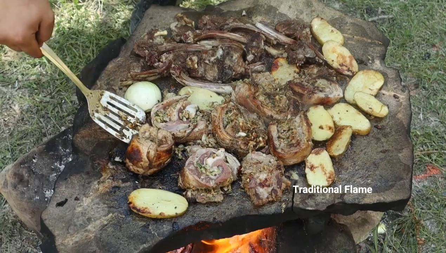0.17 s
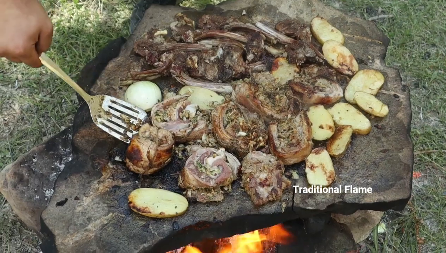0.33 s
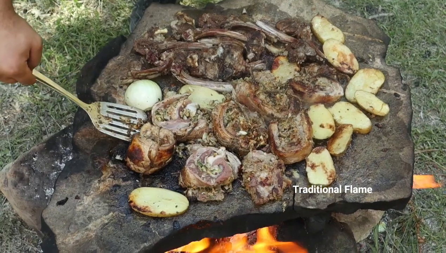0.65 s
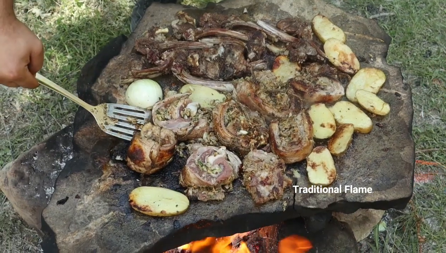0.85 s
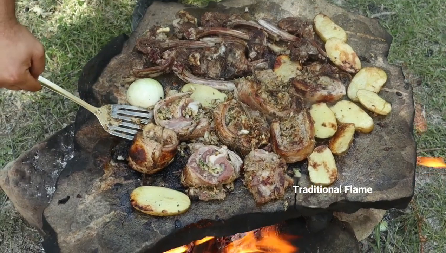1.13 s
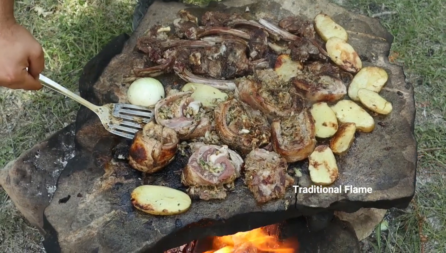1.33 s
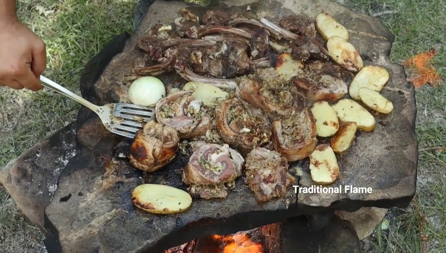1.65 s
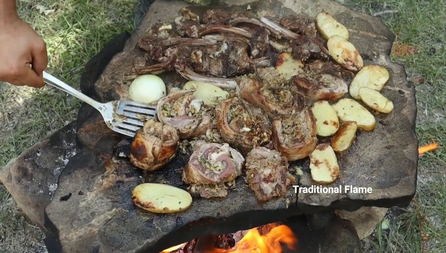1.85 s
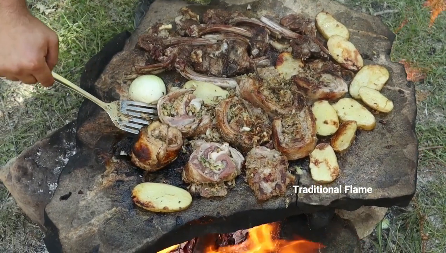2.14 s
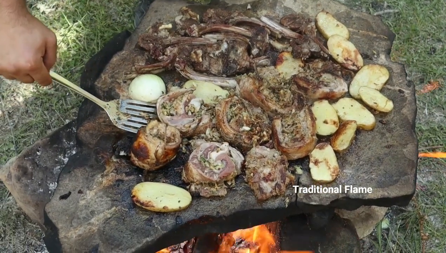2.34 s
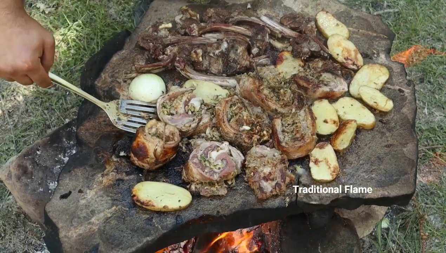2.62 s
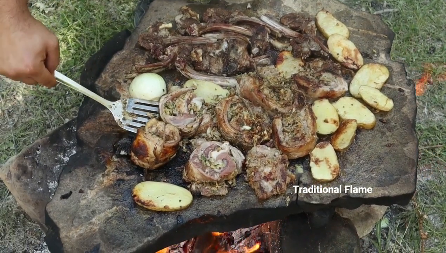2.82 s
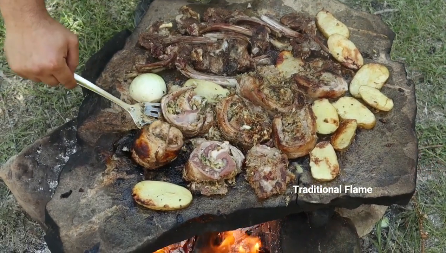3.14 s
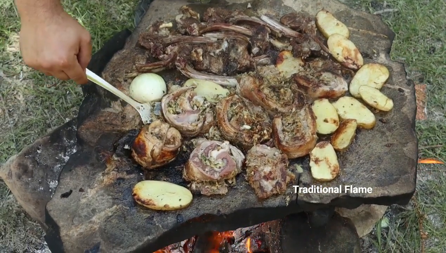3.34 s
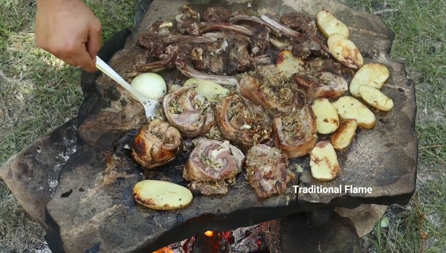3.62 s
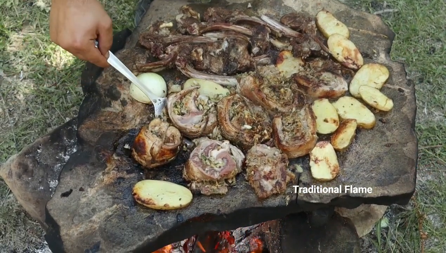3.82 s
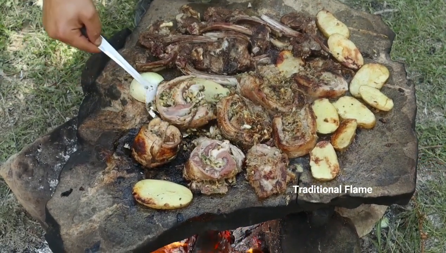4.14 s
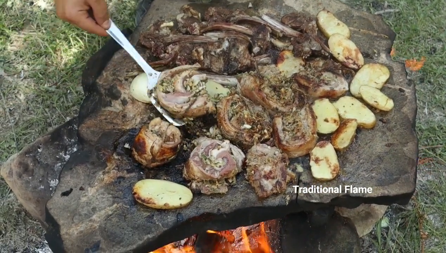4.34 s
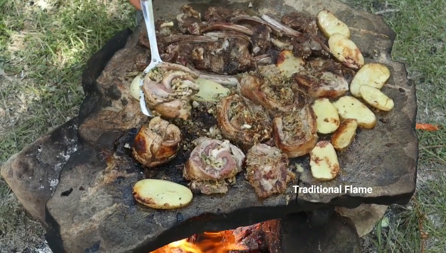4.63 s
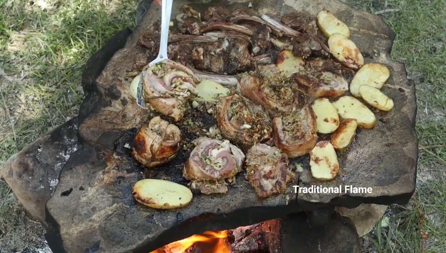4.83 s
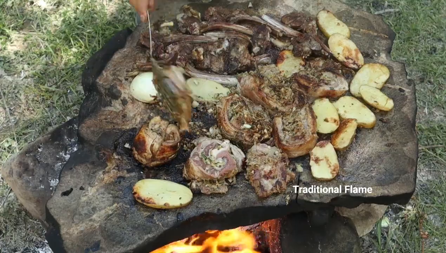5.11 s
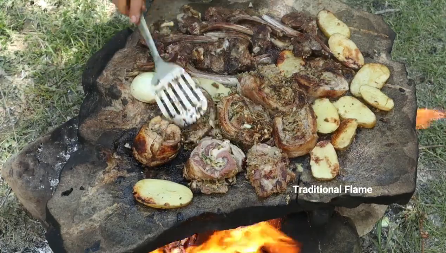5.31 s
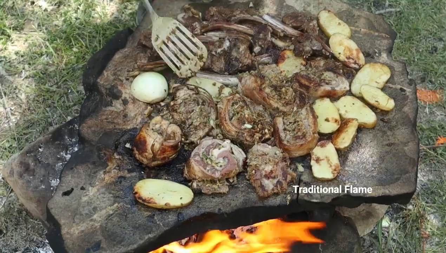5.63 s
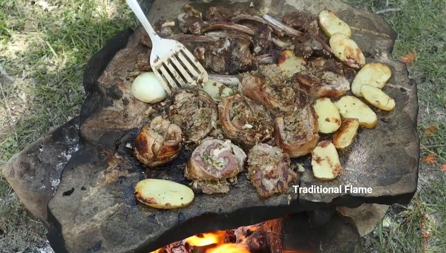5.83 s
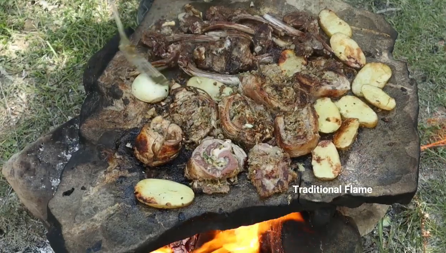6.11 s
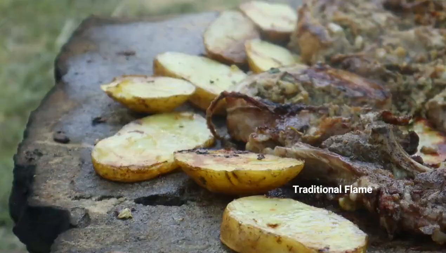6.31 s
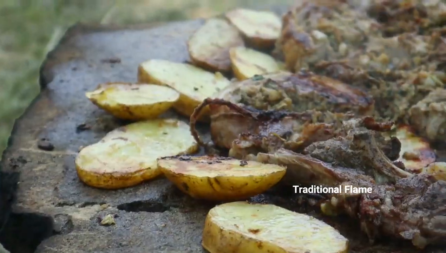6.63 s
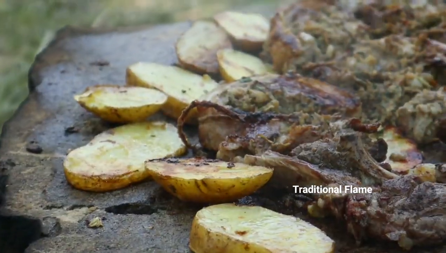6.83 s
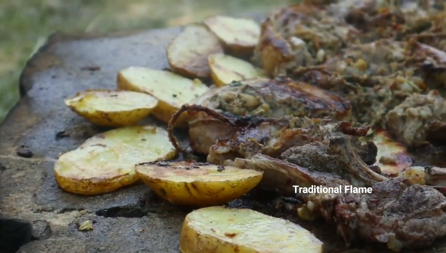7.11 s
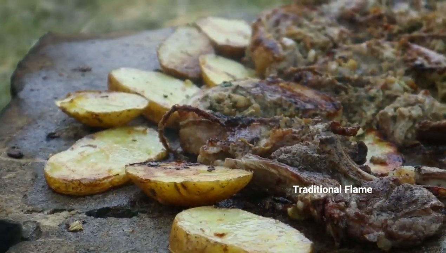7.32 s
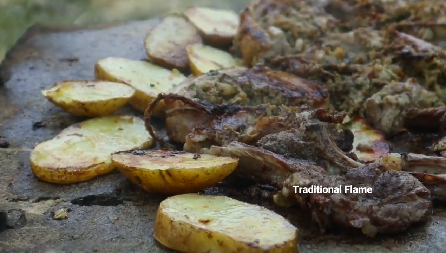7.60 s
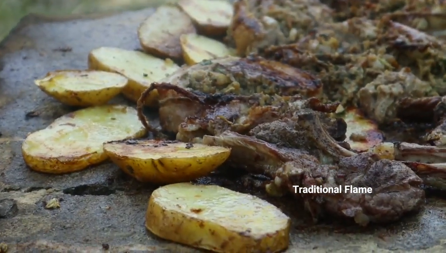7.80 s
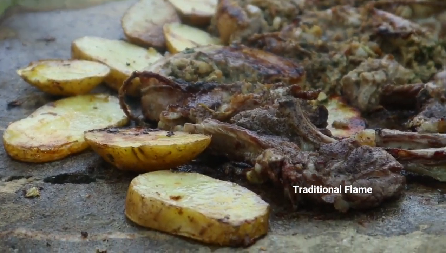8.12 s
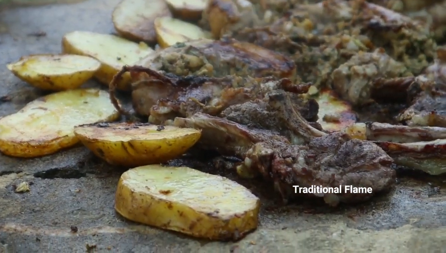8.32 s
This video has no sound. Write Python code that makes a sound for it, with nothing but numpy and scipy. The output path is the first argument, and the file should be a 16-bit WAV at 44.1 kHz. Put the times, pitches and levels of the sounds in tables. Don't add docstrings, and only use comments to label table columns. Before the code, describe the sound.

A close single microphone in open air catches fatty meat sizzling on hot stone: airy hiss, dense fizz, wet spits, woody-bright plops and dry snaps. Below, a wood fire flutters and rumbles faintly, flaring mid-way and at the end. Turning a piece makes the spitting busier; then comes a blink of silence and a gentler sizzle with sparse pops.

```python
import sys
import numpy as np
from scipy import signal
from scipy.fft import rfft, irfft, next_fast_len
from scipy.io import wavfile
from scipy.ndimage import uniform_filter1d, map_coordinates

SR = 44100
rng = np.random.default_rng(int(sys.argv[2]) if len(sys.argv) > 2 else 0)


def file_out(sig):
    cols = np.atleast_2d(sig).T
    lim = np.clip(cols, -1, 1)
    pcm = np.round(lim * 32767).astype(np.int16)
    wavfile.write(sys.argv[1], SR, pcm)


def voltage_ratio(decibels):
    exponent = np.asarray(decibels, float) / 20
    return 10 ** exponent


N = 373086
TIME = np.arange(N) / SR

# t/s, level/dB, fine bubbles over coarse/dB
FRYING = [(0, -51.5, 1), (.15, -49, -1.5), (.45, -48.5, -2), (.7, -45, 1.5), (1.2, -49, 2.5),
          (1.85, -46, 2), (2.5, -48, -0.5), (3.27, -48, 0.5), (3.5, -47.5, -0.5), (3.95, -49, 0),
          (4.8, -48, 0), (5.2, -49, -0.5), (5.45, -48, 0.5), (6.38, -47, 0.5), (6.43, -50, 1),
          (6.9, -51, 1), (7.9, -50.5, -0.5), (8.46, -51, 0)]
# t/s, peak level/dB, f/Hz, life/cycles
RESTING_PLOPS = [(0.0312, -22, 2600, 1.5), (1.0913, -22, 3370, 1), (0.1709, -23, 1390, 1.3),
                 (0.2295, -17, 2820, 0.52), (0.8917, -20, 2070, 0.92), (1.0713, -18.5, 2520, 0.35),
                 (1.1257, -22, 2380, 0.57), (1.4057, -18.5, 2540, 0.55), (1.471, -17, 2960, 0.44),
                 (1.526, -18, 2780, 1.6), (1.5515, -16.5, 3270, 1), (1.7297, -16.5, 2530, 0.47),
                 (1.7654, -16.5, 2390, 0.6), (1.88, -17.5, 2480, 1.12), (1.9982, -18, 4100, 1.2),
                 (2.167, -19.5, 2400, 1.3), (2.1991, -19, 2520, 0.73), (2.3472, -19, 2730, 2.1),
                 (2.4086, -17, 2400, 0.76), (2.6086, -19.5, 3560, 1.4), (2.6318, -16.5, 3020, 1.1),
                 (2.7745, -13, 4360, 0.36), (2.9028, -17.5, 2650, 0.99), (2.9228, -17, 2800, 0.87),
                 (3.2513, -18, 2250, 1.1), (3.4931, -19, 3040, 1), (3.9632, -21.5, 2760, 1.5),
                 (3.9782, -21.5, 2630, 1.6), (4.0067, -22.5, 2450, 2.3), (4.1755, -17, 2210, 1.7)]
# t/s, peak level/dB, f/Hz, life/cycles
TURNED_PLOPS = [(4.3649, -20.5, 2500, 4.5), (4.4818, -12.5, 3600, 0.66), (5.578, -23, 2260, 1.4),
                (4.6345, -16.5, 3440, 1.2), (4.647, -17, 2480, 1.1), (4.7642, -20.5, 3240, 1.4),
                (4.8383, -22, 2740, 1.05), (4.8829, -22, 3360, 2.5), (5.0286, -19.5, 2510, 0.96),
                (5.294, -14.5, 3850, 1.1), (5.3091, -15.5, 3530, 1.2), (5.5124, -21.5, 2080, 0.66),
                (5.4525, -17, 3000, 0.45), (5.782, -19, 3670, 2.4), (5.7897, -16.5, 2860, 0.64),
                (5.8456, -13.5, 3130, 0.49), (5.85, -15.5, 2040, 0.57), (5.889, -16, 2980, 0.84),
                (5.922, -16, 2920, 0.5), (5.9258, -16.5, 2030, 0.65), (6.3129, -12, 3770, 0.48),
                (6.324, -16.5, 2500, 0.61), (6.5096, -18, 3540, 1.4), (6.6637, -22, 2190, 0.98),
                (7.0248, -15, 3770, 1.4), (7.2578, -23, 2090, 1.2), (7.7533, -16, 3120, 0.58),
                (7.8607, -18.5, 2200, 0.27), (7.8853, -16, 4120, 0.47), (8.2649, -19.5, 4090, 1.5)]
# t/s, peak level/dB, f/Hz
RESTING_SNAPS = [(0.2242, -24, 4120), (0.6029, -23.5, 10470), (0.6735, -15.5, 7210), (0.7174, -14.5, 7000),
                 (0.735, -14, 7600), (1.2206, -17.5, 5520), (1.27, -18, 7250), (1.7423, -21, 7520),
                 (2.008, -22.9, 5560), (2.4391, -22, 5370), (2.4433, -16, 9100), (2.7695, -24, 7110),
                 (3.0518, -14.5, 7050), (3.268, -28, 8190), (3.446, -27, 5940), (3.695, -17.5, 6400),
                 (3.911, -23, 5750), (6.3684, -24, 4800), (4.0034, -20.5, 4580), (6.4423, -18.5, 4770),
                 (6.6173, -19, 6800), (6.7417, -16.5, 7850), (7.3054, -19.5, 7800), (7.4117, -22, 4550),
                 (7.4646, -21, 5200), (7.8574, -13, 8360), (8.0843, -19.5, 6500), (8.1206, -20.5, 10110),
                 (8.136, -21, 9300), (8.3813, -19, 4500)]
# t/s, peak level/dB, f/Hz
TURNING_SNAPS = [(4.1804, -18.5, 4560), (4.2088, -19, 7540), (4.422, -17, 7570), (4.506, -18, 6700),
                 (4.6867, -10.5, 8300), (4.7386, -19, 7030), (4.7491, -16, 6760), (4.7856, -10.5, 6000),
                 (4.7985, -17, 5950), (4.8077, -13, 7000), (4.819, -18.5, 5200), (4.647, -18, 6500),
                 (4.9289, -15.5, 6540), (4.962, -16, 7470), (5.0588, -20, 5450), (5.1548, -19.5, 5700),
                 (5.2638, -20, 4500), (5.3569, -13.5, 4700), (5.3893, -19, 5960), (5.409, -16.5, 5900),
                 (5.507, -17, 7450), (5.527, -18, 6760), (5.5386, -20.5, 4320), (5.753, -15, 4930),
                 (5.772, -16, 6600), (5.83, -20, 5560), (5.98, -18.5, 6220), (6.0942, -22, 6000),
                 (6.1248, -20, 6190), (6.1446, -13, 5400)]
# t/s, peak level/dB, f/Hz
MUFFLED_BURSTS = [(0.079, -26.5, 1170), (1.2666, -29.5, 1000), (1.2877, -37, 1100), (2.035, -25.5, 1200),
                  (2.051, -29, 930), (2.439, -29, 1290), (2.7746, -30, 1370), (4.06, -30, 960),
                  (5.47, -34, 1500), (5.844, -28, 1370), (7.6, -29, 1300)]
TURN = (4.2, 4.5, 6.3)
# from t/s, to t/s, level before/dB
WAKE = (.8, .9, -6)
# from t/s, to t/s
CUT = (6.3874, 6.4206)
# f/Hz, density level/dB
STEAM = [(240, -44), (400, -9), (707, 1.5), (1040, -0.5), (2240, 1), (6380, -1), (8280, -6), (10300, -2.5),
         (14200, -2.5), (15800, -4)]
# f/Hz, density level/dB
JET = [(5200, -30), (6600, -2), (7600, 3), (8800, 3.5), (9800, -7), (11500, -34)]
# t/s, level/dB
DRAUGHT_LEVEL = [(0, -74), (.5, -67.5), (.7, -63), (1, -69), (1.45, -68), (1.7, -79), (2.35, -67),
                 (2.7, -71.5), (3.3, -70), (3.7, -66.5), (4.3, -66.5), (4.7, -70.5), (5.9, -70.5),
                 (6.75, -61), (6.95, -71), (7.4, -71), (8.46, -67)]
# full at t/s, hold/s, level/dB
FLARES = [
    (1.45, .1, 2.5),
    (3.37, 0.78, 6),
    (8.304, .2, 5),
]
# f/Hz, density level/dB
FLAME = [(53, -30), (90, -10), (199, 1.5), (313, -4.5), (469, -11), (600, -13), (780, -33), (1320, -120)]
# f/Hz, density level/dB
DRAUGHT = [(12, -33), (20, -3), (102, -5), (150, -10.5), (200, -29), (330, -120)]
# f/Hz, level/dB
MICROPHONE = [(100, -5), (3000, -1.5), (6300, -1.5), (8300, 2), (9000, -0.5), (10300, -9.5), (12000, -3.5),
              (14200, -4.5), (15600, -9.5)]
# f/Hz, level/dB
SECOND_VIEW = [(4500, 2), (6300, -0.5), (8400, -0.5), (10500, -0.5), (13000, 0)]


def unit(x):
    return x / np.sqrt(np.mean(x ** 2) + 1e-20)


def along(points, hz):
    f, v = np.transpose(points)
    return np.interp(np.log(hz + 1), np.log(f + 1), v)


def curves(rows):
    s, *columns = np.transpose(rows)
    return [np.interp(TIME, s, column) for column in columns]


def wobble(rate):
    knots = rng.standard_normal(int(N * rate / SR) + 4)
    return map_coordinates(knots, [np.arange(N) * rate / SR])


def coloured(x, points, causal=False):
    m = 2 * next_fast_len(N // 2 + 4096)
    gain = voltage_ratio(along(points, np.fft.rfftfreq(m, 1 / SR)))
    if causal:
        cepstrum = irfft(np.log(gain + 1e-6), m)
        cepstrum[1:m // 2] *= 2
        cepstrum[m // 2 + 1:] = 0
        gain = np.exp(rfft(cepstrum))
    return irfft(rfft(x, m) * gain, m)[..., :N]


def turning():
    return np.interp(TIME, [TURN[0], TURN[1], TURN[2], CUT[0]], [0, 1, 1, 0])


def bursts(s, db, hz, life, onset, splash_db, size):
    splash_t60 = .006
    start = np.clip(s * SR, 0, N - 1)
    step = np.arange(size)
    t = np.maximum(step - start[:, None] % 1, 0) / SR
    cycle = t * hz[:, None]
    decay = np.exp(-np.maximum(cycle - .75, 0) / life[:, None])
    swell = (1 - np.exp(-(cycle / onset) ** 2)) * decay
    ring = -np.sin(2 * np.pi * cycle * (1 + 0.011 * cycle)) * swell
    ring -= 0.97 * swell * (ring.sum(1) / swell.sum(1))[:, None]
    spray = uniform_filter1d(rng.standard_normal(t.shape), size=7, axis=1) * np.sin(2 * np.pi * 1.9 * cycle)
    splash = voltage_ratio(splash_db - 60 * t / splash_t60) * (cycle > .3) * spray
    rows = voltage_ratio(db)[:, None] * (ring + splash)
    place = start.astype(int)[:, None] + step
    return np.bincount(place.ravel(), rows.ravel(), N + size)[:N]


def swarm(busy, count, mid_hz, octaves, spread_db, cap_db, life, onset, size):
    share = np.cumsum(busy)
    luck = rng.random((count, 2))
    draw = rng.standard_normal((count, 2))
    s = np.interp(luck[:, 0] * share[-1], share, TIME)
    cap = cap_db + 2 * draw[:, 1] - 1.2 * (s > CUT[1])
    db = np.minimum(-spread_db * np.log(1 - luck[:, 1]), cap)
    hz = np.clip(mid_hz * 2 ** (octaves * draw[:, 0]), 1400, 15500)
    lives = life * np.exp(0.21 * rng.standard_normal(count))
    return unit(bursts(s, db, hz, lives, onset, splash_db=-6, size=size))


def frying():
    vigour_db, fine_db = curves(FRYING)
    turn = turning()
    wake_db = np.interp(TIME, WAKE[:2], [WAKE[2], 0])
    crackle_db = vigour_db - 1.6 - 0.18 * fine_db - 1.5 * turn + wake_db + 0.93 * (TIME > CUT[1])
    spit_db = vigour_db - 0.53 - 0.98 * fine_db + 3.5 * turn + 1.7 * wobble(4)
    fizz_db = vigour_db - 0.6 + 1.0 * fine_db
    mist_db = 0.4 * fizz_db - 28.5
    busy = np.exp(.42 * wobble(60))
    crackle = swarm(busy, count=2200, mid_hz=2220, octaves=0.32, spread_db=8.5, cap_db=15.5,
                    life=0.79, onset=0.42, size=150)
    spit = swarm(busy, count=3200, mid_hz=3855, octaves=0.19, spread_db=5.0, cap_db=14.0,
                 life=0.62, onset=0.4, size=120)
    fizz = swarm(busy, count=5500, mid_hz=7800, octaves=0.287, spread_db=5.0, cap_db=14.5,
                 life=1.0, onset=0.22, size=80)
    mist = swarm(busy, count=4000, mid_hz=12070, octaves=0.264, spread_db=8.5, cap_db=21.0,
                 life=0.74, onset=0.58, size=60)
    return voltage_ratio(crackle_db) * crackle + voltage_ratio(spit_db) * spit + voltage_ratio(fizz_db - 1.0) * fizz + voltage_ratio(mist_db) * mist


def strays(busy, count, mid_db, mid_hz, octaves):
    draw = rng.standard_normal((count, 2))
    share = np.cumsum(busy)
    order = (np.arange(count) + 3 * rng.random(count)) / (count + 2)
    s = np.interp(order * share[-1], share, TIME)
    return np.array([s, mid_db + 0.73 * draw[:, 0], mid_hz * 2 ** (octaves * draw[:, 1])])


def large_bubbles():
    known = np.vstack([RESTING_PLOPS, TURNED_PLOPS]).T
    reach = .03 * 2 * SR
    near = np.bincount((known[0] * SR).astype(int), minlength=N)
    near = uniform_filter1d(near * reach, size=int(reach))
    busy = .4 * (TIME > WAKE[0]) + np.abs(near) + 2.5 * turning()
    some = strays(busy, count=60, mid_db=-23.5, mid_hz=3050, octaves=.2)
    return np.hstack([known, np.vstack([some, 0.77 + 0 * some[0]])])


def plops(large):
    s, db, hz, life = large
    ring = bursts(s - 0.81 / hz, db + 0.2, hz, .8 * life, onset=0.56, splash_db=-3.5, size=300)
    tick = bursts(s - .3 / hz, db - 21, 9000 + 0 * s, 0.59 + 0 * s, onset=0.13, splash_db=-9, size=300)
    return ring + tick


def thuds(large):
    s, db, hz, _ = large
    body_db = db - 15.5 - 13.5 * np.abs(np.log2(hz / 2300))
    s, db, hz = np.hstack([[s, body_db, 0.4 * hz], np.transpose(MUFFLED_BURSTS)])
    return bursts(s - 0.61 / hz, db, hz, 0.21 + 0 * s, onset=0.32, splash_db=-15, size=300)


def snaps():
    some = strays(1 + 7 * turning(), count=56, mid_db=-22, mid_hz=6330, octaves=.22)
    s, db, hz = np.hstack([np.vstack([RESTING_SNAPS, TURNING_SNAPS]).T, some])
    life = .5 * np.exp(.25 * rng.standard_normal(len(s)))
    ring_db = db - 0.5 * along(MICROPHONE, hz) - 0.9
    ring = bursts(s - .5 / hz, ring_db, hz, life, onset=.1, splash_db=-2.0, size=300)
    tick = bursts(s - .5 / hz, db - 16, 13000 + 0 * s, .5 + 0 * s, onset=.1, splash_db=-20, size=60)
    return ring + tick


def pops():
    large = large_bubbles()
    return plops(large) + thuds(large) + snaps()


def steam():
    vigour_db, fine_db = curves(FRYING)
    hiss = unit(coloured(rng.standard_normal(N), STEAM))
    jet = unit(voltage_ratio(1.5 * wobble(25)) * coloured(rng.standard_normal(N), JET))
    hiss_db = 0.84 * vigour_db - 3 - 1.1 * turning()
    jet_db = vigour_db - 7 + 2.4 * fine_db
    return voltage_ratio(hiss_db) * hiss + voltage_ratio(jet_db) * jet


def fire():
    rise, fall = 0.069, 0.61
    draught_db, = curves(DRAUGHT_LEVEL)
    flame_db = -41 + .25 * draught_db
    for s, hold, db in FLARES:
        corners = s + np.cumsum([-rise, rise, hold, fall])
        flame_db = flame_db + np.interp(TIME, corners, [0, db, db, 0])
    flutter_db = 1.56 * wobble(14) + 0.84 * wobble(5)
    flame = unit(voltage_ratio(flutter_db) * coloured(rng.standard_normal(N), FLAME))
    draught = unit(voltage_ratio(0.81 * wobble(6)) * coloured(rng.standard_normal(N), DRAUGHT))
    return voltage_ratio(flame_db) * flame + voltage_ratio(draught_db + 8.0) * draught


def scene():
    sizzle = voltage_ratio(-0.43) * (frying() + voltage_ratio(-0.45) * steam())
    sizzle = np.where(TIME < CUT[1], sizzle, coloured(sizzle, SECOND_VIEW))
    return (pops() + sizzle + fire())[None]


def roll_off(x):
    return signal.sosfilt(signal.butter(12, 16650, fs=SR, output="sos"), x)


def record(dry):
    top_hz = 15680
    x = coloured(dry, MICROPHONE, causal=True)
    low = coloured(x, [(top_hz, 0), (top_hz + 60, -120)])
    high = coloured(x - low, [(top_hz, 0), (16200, -12), (16600, -20)])
    sharp = uniform_filter1d(1. * (np.abs(x) > voltage_ratio(-21)), size=200) > 0
    x = low + voltage_ratio(-4) * uniform_filter1d(1. * sharp, size=200) * high
    inside = np.minimum(TIME - CUT[0], CUT[1] - TIME)
    smear_db = -30 - 1800 * inside - 300 * (TIME - CUT[0])
    x = x * np.where(inside > 0, voltage_ratio(smear_db), 1)
    return roll_off(x)


dry = scene()
out = record(dry)
file_out(out)
```